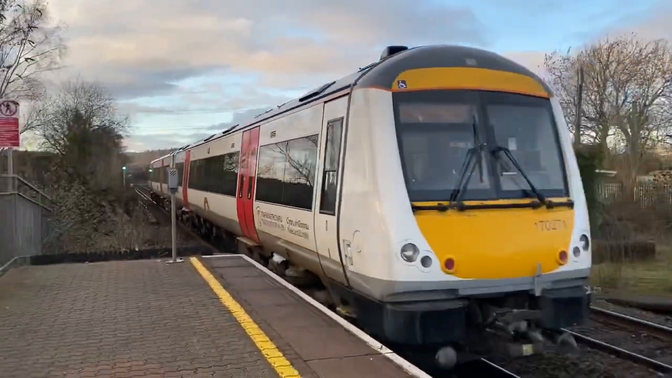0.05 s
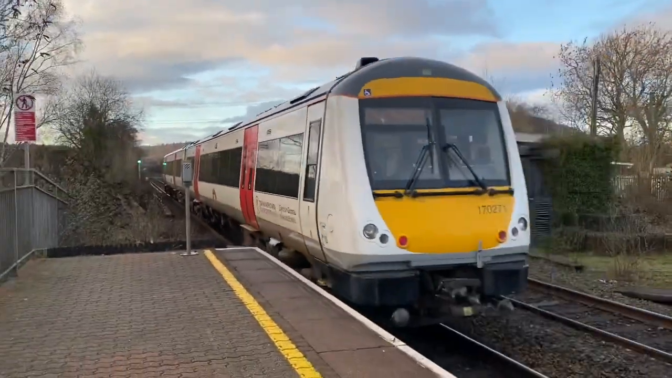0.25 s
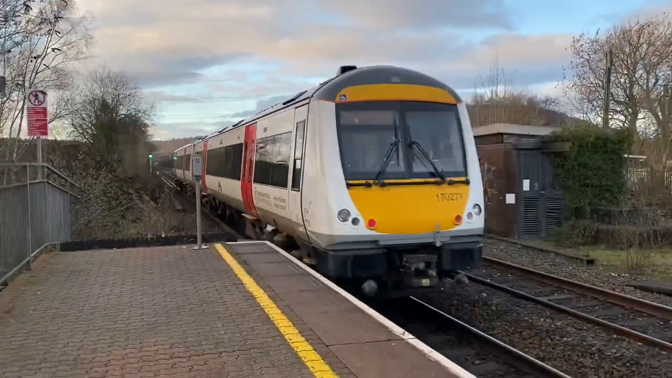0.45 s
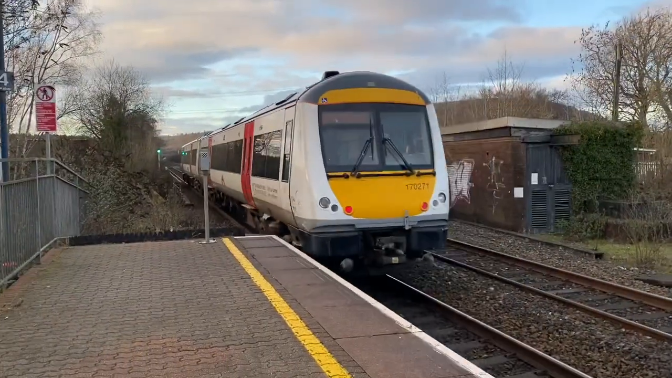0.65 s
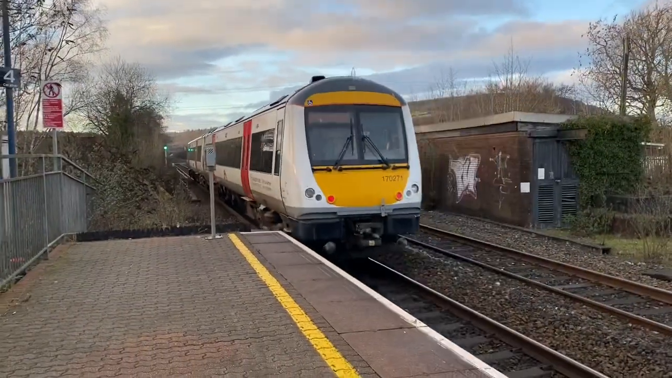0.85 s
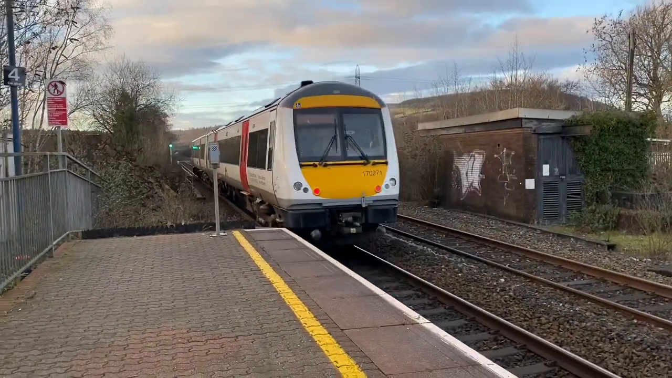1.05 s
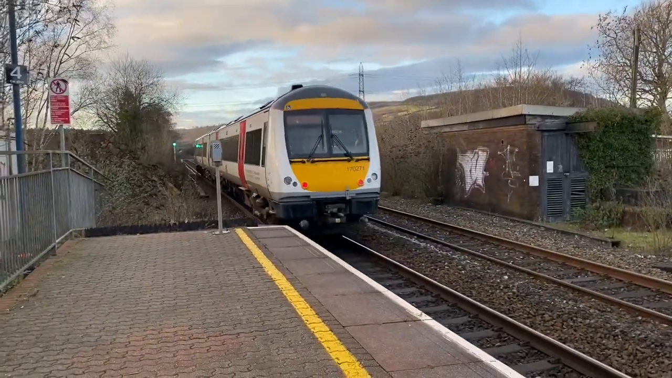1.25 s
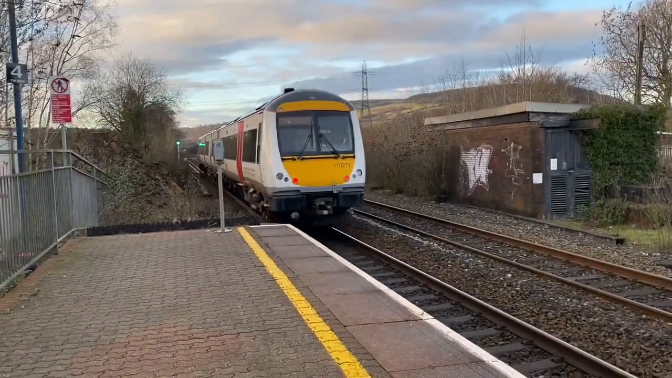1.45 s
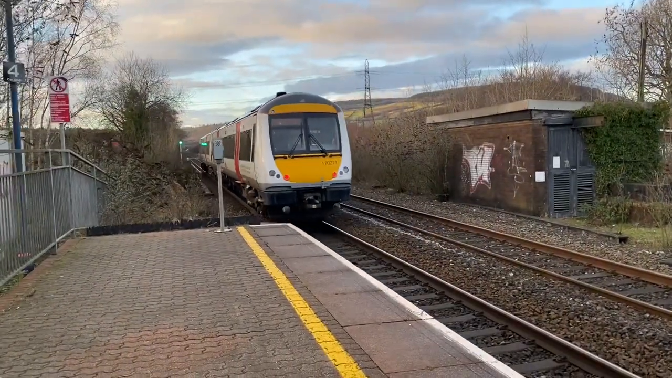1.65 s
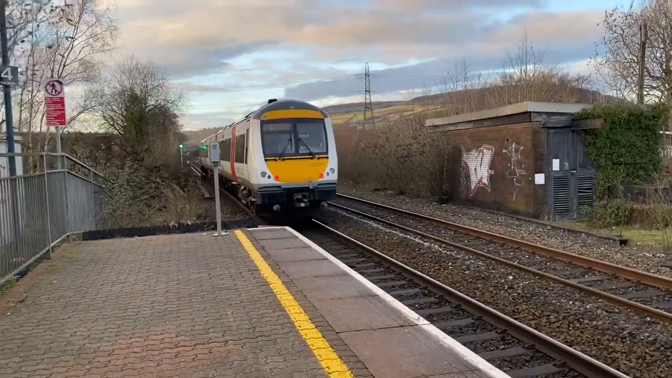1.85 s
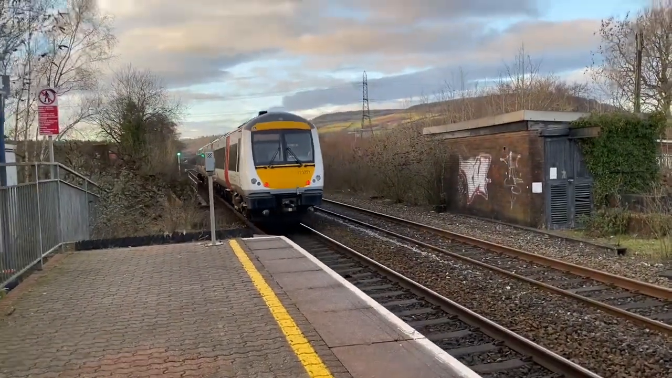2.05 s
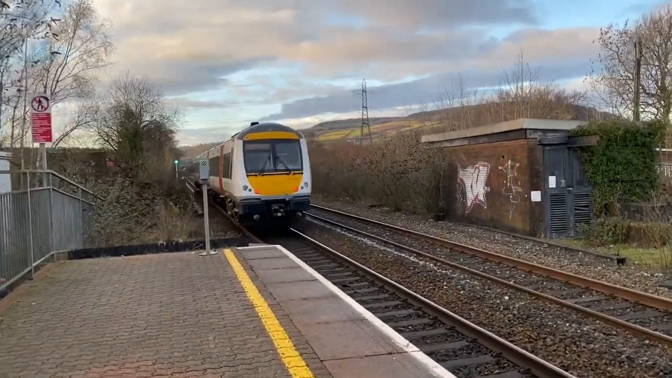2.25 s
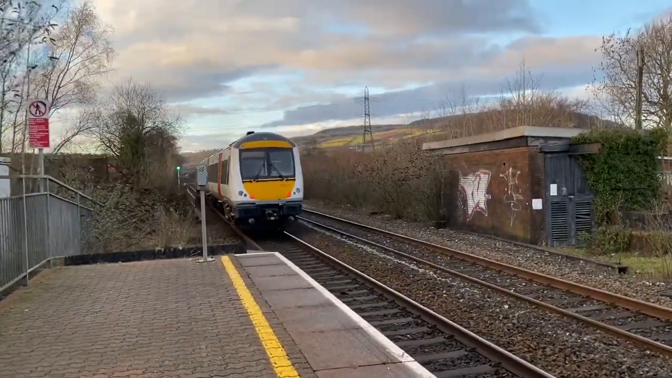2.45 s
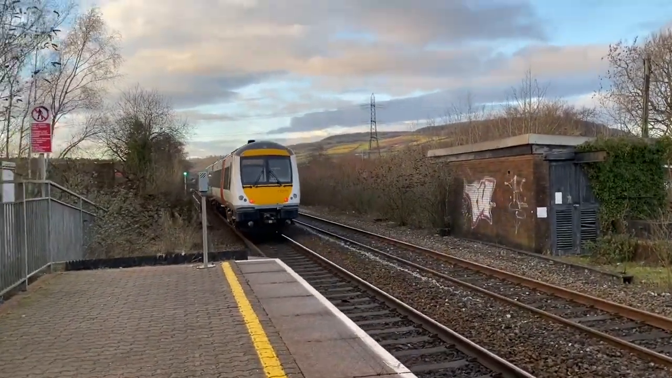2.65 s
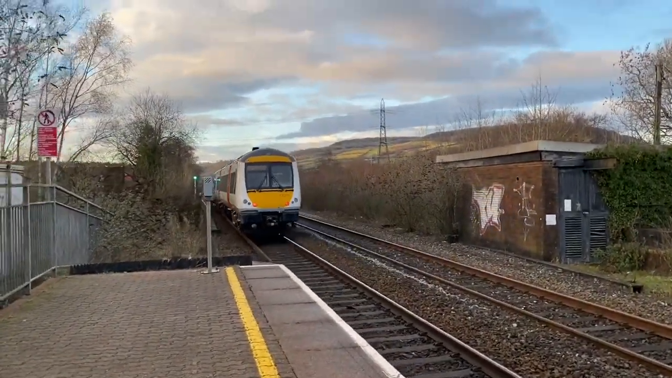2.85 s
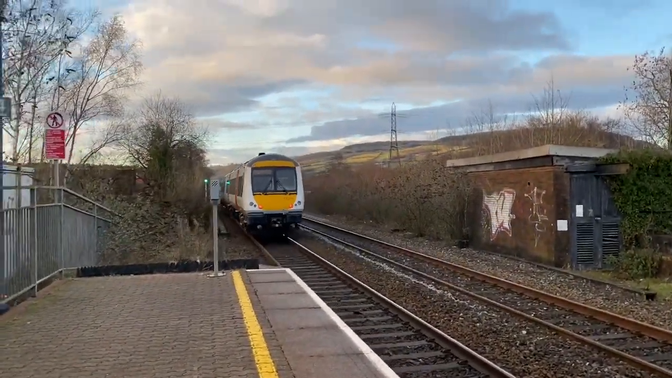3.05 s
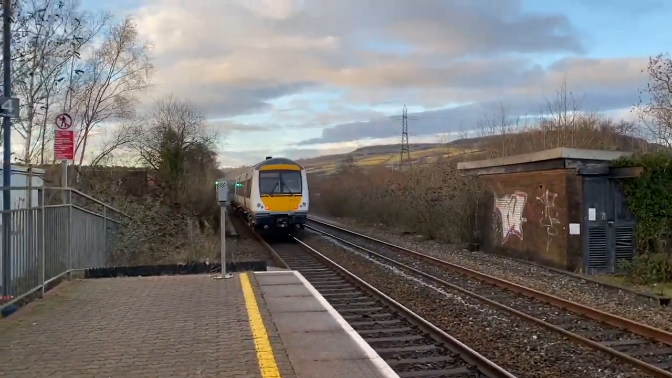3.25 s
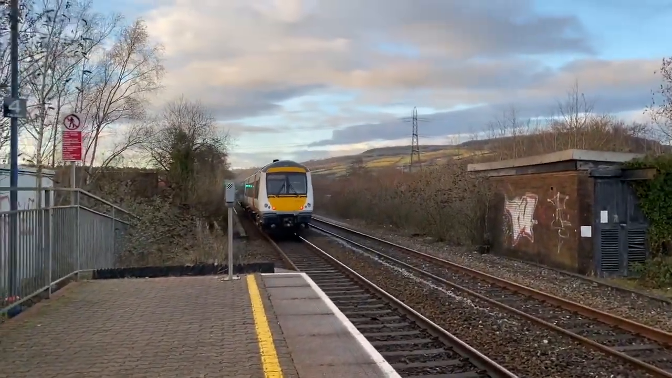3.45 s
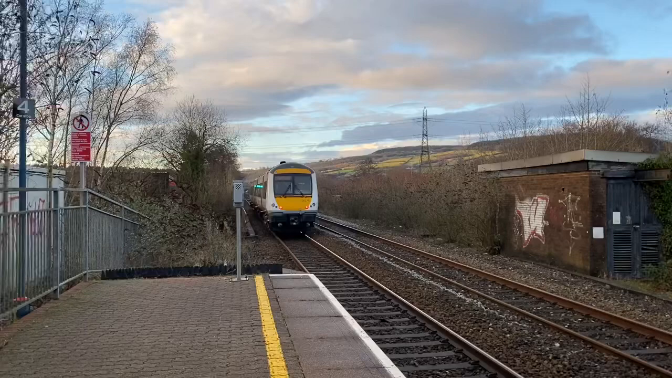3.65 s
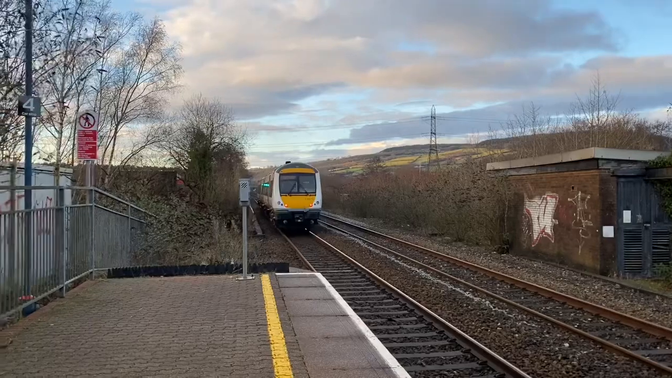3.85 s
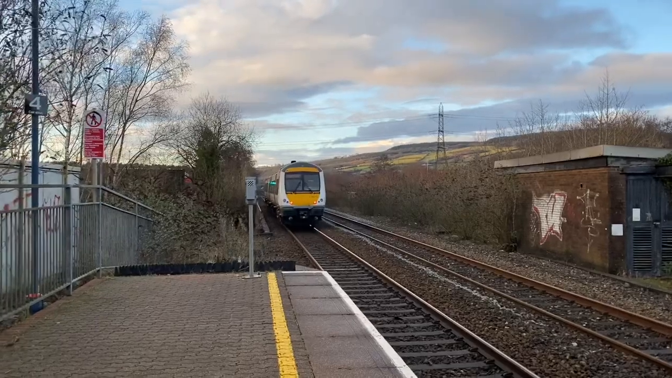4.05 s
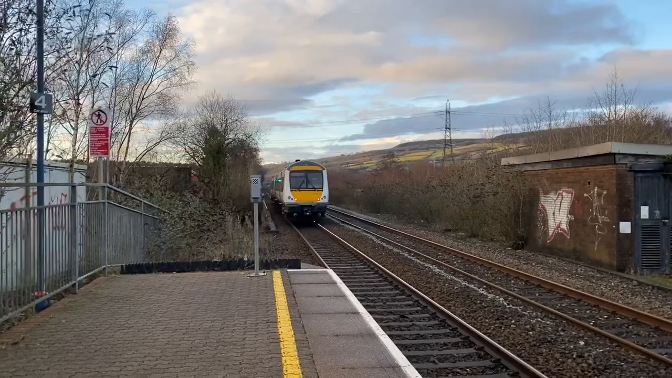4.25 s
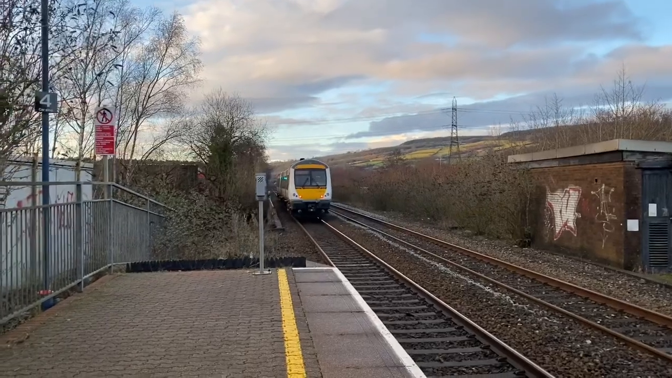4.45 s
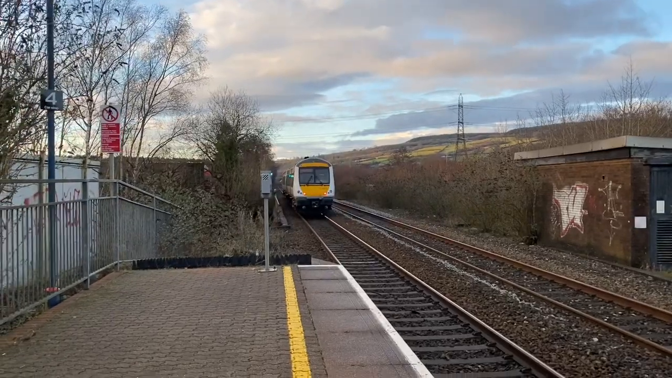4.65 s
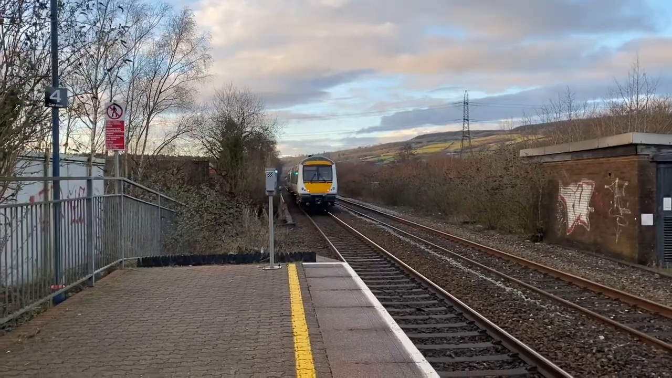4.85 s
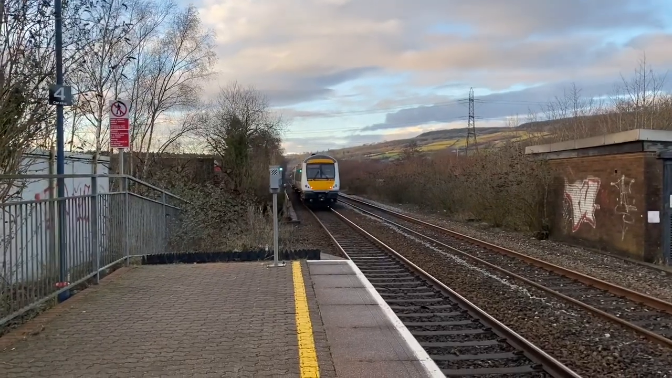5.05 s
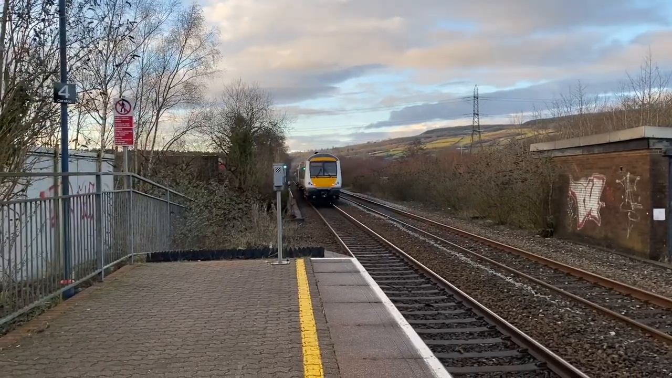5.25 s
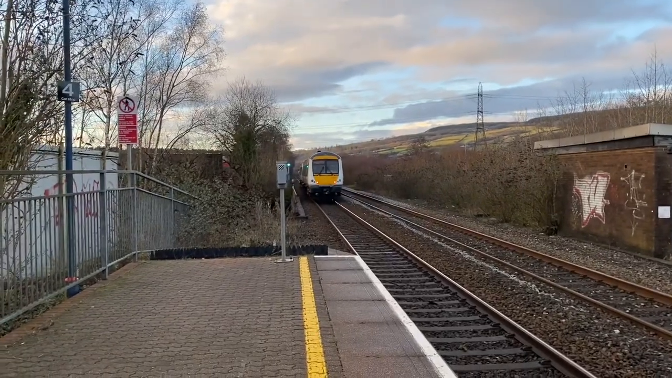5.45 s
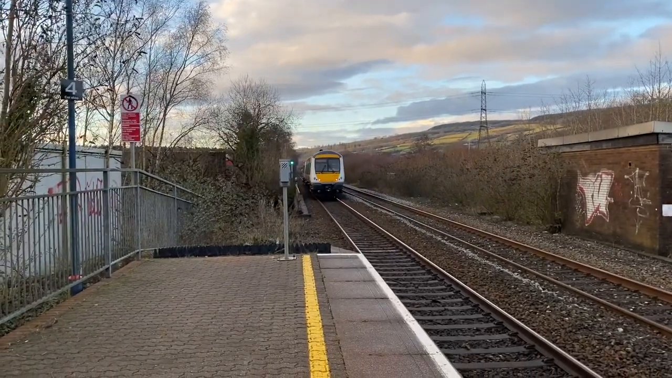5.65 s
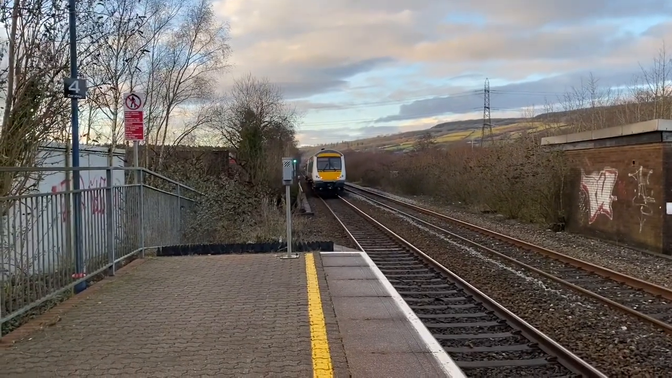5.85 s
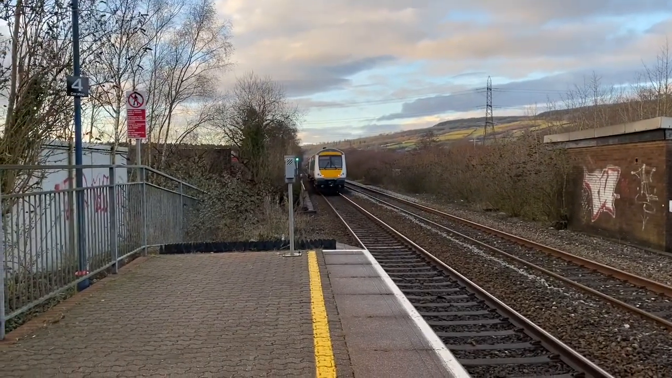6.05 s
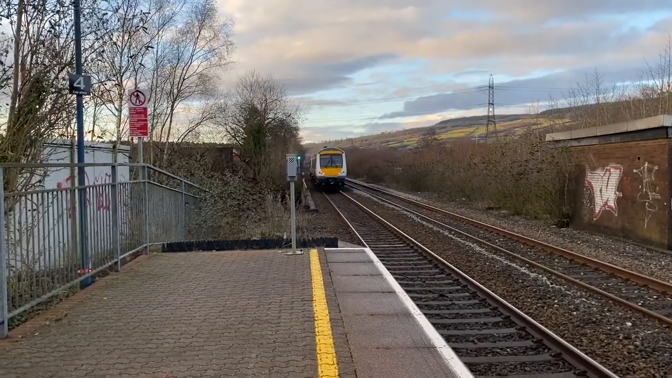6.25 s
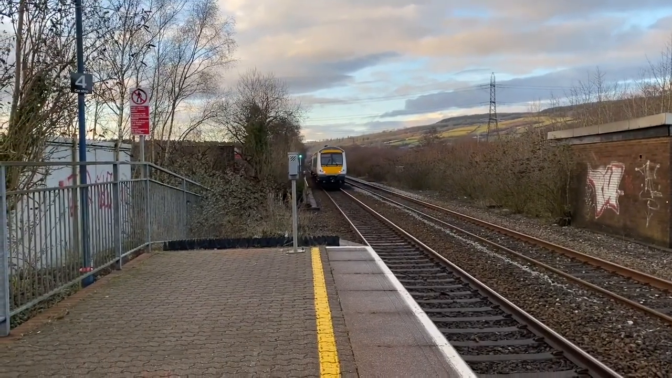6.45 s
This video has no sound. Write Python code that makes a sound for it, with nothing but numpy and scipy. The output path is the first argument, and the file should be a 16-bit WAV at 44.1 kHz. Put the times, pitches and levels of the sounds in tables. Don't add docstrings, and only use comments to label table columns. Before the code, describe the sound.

Outdoors on a station platform, a handheld stereo microphone hears a diesel train leaving. At 0 s it is close and full: two underfloor engines drone low and buzzy, one climbing in pitch through the first couple of seconds, the other nearly steady, so they beat together. Rapid uneven exhaust knocks, wheel roar, boomy rumble, combustion clatter and bright airy hiss surround them. Between 1.3 and 2.8 s the throttle surges, with hoarse singing panels and a faint wavering gear whine. From 3 s the train recedes; knocks blur, hiss and clatter thin out, and a soft hum and rumble remain. Small birds twitter from about 3 s, busier after 4 s, with high short whistles and lower falling chirps. A dull thud comes at 3.5 s, more from 5.4 s, a tiny tick at 5.7 s, and the strongest thud at 6.1 s. A wind hiss swells abruptly from 6.4 s until the end at 6.5 s.

```python
import sys
import numpy as np
from scipy import signal
from scipy.fft import rfft, irfft, next_fast_len
from scipy.io import wavfile
from scipy.ndimage import uniform_filter1d, map_coordinates

SR = 44100
rng = np.random.default_rng(int(sys.argv[2]) if len(sys.argv) > 2 else 0)


def unload_audio(sound):
    columns = np.transpose(np.atleast_2d(sound))
    steps = np.round(np.clip(columns, -1, 1) * 32767)
    wavfile.write(sys.argv[1], SR, steps.astype(np.int16))


def volts_from_decibels(level):
    exponent = np.asarray(level, float) / 20
    return 10 ** exponent


N = 287091
TIME_S = np.arange(N) / SR


def unit(x):
    return x / np.sqrt(np.mean(x ** 2) + 1e-20)


def along(points, hz):
    point_hz, value = np.transpose(points)
    return np.interp(np.log(hz + 1), np.log(point_hz + 1), value)


def curves(rows):
    time_s, *columns = np.transpose(rows)
    return [np.interp(TIME_S, time_s, column) for column in columns]


def wobble(rate_hz):
    steps = np.arange(0, N + 32, 32)
    knots = rng.standard_normal(int(N * rate_hz / SR) + 4)
    return np.interp(np.arange(N), steps, map_coordinates(knots, [steps * rate_hz / SR]))


def patches(shape, bins, frames):
    field = uniform_filter1d(rng.standard_normal(shape), size=bins, axis=0)
    return unit(uniform_filter1d(field, size=frames, axis=1))


def filtered(x, response):
    m = next_fast_len(N + 8192)
    return irfft(rfft(x, m) * response(np.fft.rfftfreq(m, 1 / SR)), m)[..., :N]


def noise(spectrum, patchy_db, gate=1):
    z = signal.stft(rng.standard_normal((2, N)), nperseg=512)[2]
    gain = volts_from_decibels(patchy_db * patches(z.shape[1:], bins=6, frames=10))
    pair = signal.istft(z * gain, nperseg=512)[1][:, :N]
    return unit(filtered(pair * gate, lambda hz: volts_from_decibels(along(spectrum, hz))))


def tone(turns, db, drift, sway_db):
    phase = 2 * np.pi * (turns + rng.random()) + drift * wobble(6.5)
    return np.sqrt(2) * volts_from_decibels(db + sway_db * wobble(9)) * np.sin(phase)


# time_s, throttle_db
THROTTLE = [(0, 0), (1.3, 1.5), (1.9, 4.5), (2.2, 5), (2.5, 5.5), (2.8, 3.5), (3.1, 2), (3.35, 3), (3.6, 3),
            (4.3, 1.5), (5.2, 2.5), (6.51, 0)]


def receding(start_db, spread_db, air_db, throttle_share):
    start_m, speed_m_s = 8, 10
    metres = speed_m_s * TIME_S
    spreading = spread_db * np.log2(1 + metres / start_m)
    return start_db - spreading - air_db * metres / 10 + throttle_share * curves(THROTTLE)[0]


def swells(rows, under_db):
    peak_s, db, half_s = np.transpose(rows)[:, :, None]
    t = np.arange(0, N + 64, 64) / SR
    bells = (volts_from_decibels(db) * np.exp(-((t - peak_s) / half_s) ** 2)).sum(axis=0)
    return 20 * np.log10(np.interp(TIME_S, t, bells) + volts_from_decibels(under_db))


# time_s, firing_hz, level_db, bite_db (per multiple above the second)
REVVING = [(0, 62.8, -30.5, -8), (.25, 66.6, -31.5, -9), (.57, 70.28, -32, -8.5), (.63, 70.9, -31.5, 0.5),
           (1.02, 73.8, -30, -0.5), (1.12, 74.5, -37.5, 0.5), (1.45, 76.3, -38, -8),
           (1.75, 77.43, -32.5, -8), (2, 77.9, -32.5, -6.5), (2.25, 79.54, -27.5, -13),
           (2.8, 80.6, -26, -9), (3, 79.74, -27, -20), (3.25, 81, -26.5, -12), (3.75, 82.06, -29, -12.5),
           (4.25, 82.3, -26, -13), (5.3, 82.85, -35.5, -14), (5.8, 82.45, -31.5, -13),
           (6.51, 82.2, -32, -11.5)]
# freq_hz, gain_db
PIPE = [(62, 1), (83, -22), (120, 3), (192, -1), (215, 2.5), (241, 10), (247, -1.5), (260, 0.5)]


def revving_engine():
    hz, db, bite_db = curves(REVVING)
    firings = np.cumsum(hz) / SR
    out = tone(5 * firings, db + 1.5 * bite_db - 9, drift=.2, sway_db=1.1)
    for k in range(4):
        level_db = db + max(k - 1, 0) * bite_db + along(PIPE, (k + 1) * hz)
        out += tone((k + 1) * firings, level_db, drift=0.12, sway_db=1.14)
    return out


# time_s, firing_hz, level_db
STEADY = [(0, 76.57, -35), (.45, 76.35, -45), (.8, 75.6, -29), (.98, 75.5, -29.5), (1.07, 75.37, -25),
          (1.3, 75.1, -23.5), (1.75, 75.6, -27), (2.4, 75.56, -27), (3, 75, -35), (3.3, 74.14, -33.5),
          (3.9, 73.87, -31), (4.3, 74.26, -32), (5.25, 77.2, -42), (6.51, 78, -43)]
# peak_s, level_db, half_length_s
ECHOES = [
    [(0, -34, 0.2), (.45, -35.5, 0.47), (1.25, -29.5, 0.11), (2.05, -36, 0.16), (3, -35, 0.12),
     (3.62, -32, 0.27)],
    [(0, -34, 0.35), (.7, -33, 0.22), (1.27, -30.5, 0.13), (1.57, -32, .07), (1.8, -35, 0.091),
     (2.15, -33.5, 0.35), (3.9, -44, 0.72), (4.7, -51.5, 0.48), (5.6, -42.5, 0.33), (6.4, -45.5, 0.47)],
    [(.3, -58, 0.25), (1.8, -55, 0.31), (3.75, -42, 0.52), (6.15, -48.5, 0.26)],
]
# camshaft_multiple, level_db
UNEVEN = [(4, -8), (5, 3), (7, -4), (8, -4), (9, 0), (10, -4), (11, 0), (14, 0), (15, 3), (17, -4),
          (21, -4), (22, 1), (27, -4), (38, -7)]


def steady_firings():
    return np.cumsum(curves(STEADY)[0]) / SR


def firing_pulse():
    return np.cos(2 * np.pi * steady_firings())


def steady_engine():
    firings = steady_firings()
    out = tone(firings, curves(STEADY)[1], drift=0.12, sway_db=1.0)
    for k, rows in enumerate(ECHOES):
        between_db = receding(-38 - 4 * k, 2.6, 0.59, 0)
        out += tone((k + 2) * firings, swells(rows, between_db), drift=0.12, sway_db=1.0)
    uneven_db = receding(-42, 0.25, 2.73, 0.093)
    for k, db in UNEVEN:
        out += tone(k / 6 * firings, uneven_db + db, drift=.45, sway_db=2.5)
    return out


# peak_s, level_db, half_length_s
SHAFT = [(0, -33, 0.15), (.55, -32, 0.14), (1.1, -48, .25), (1.82, -33, 0.17), (3.4, -38, 0.21),
         (5.25, -45.5, 0.22)]


def drive_shaft():
    start_hz, gain_hz_s, ease_hz_s2 = 81.05, 4.7, .17
    hz = start_hz + gain_hz_s * TIME_S - ease_hz_s2 * TIME_S ** 2
    return tone(np.cumsum(hz) / SR, swells(SHAFT, receding(-35, 2.8, 0.98, 0)), drift=0.51, sway_db=0.0)


# freq_hz, density_db
RUMBLE = [(20, -60), (35, -18.5), (60, -2), (110, -1), (190, -5), (260, -6), (380, -17.5), (520, -62)]


def rumble():
    level_db = receding(-30, 1.5, 0.53, 0.3) + .8 * wobble(4)
    return volts_from_decibels(level_db) * noise(RUMBLE, patchy_db=1.2)


def roar_level_db():
    return receding(-35, 1.2, 1.49, 0.19)


# freq_hz, density_db
ROLL = [(250, -36), (340, 0), (400, -3.5), (480, -1.5), (650, -2.5), (800, -4.5), (1000, -10), (1400, -42)]


def rolling():
    return volts_from_decibels(roar_level_db()) * noise(ROLL, patchy_db=1.36, gate=1 + 0.065 * firing_pulse())


CYLINDERS = [0, -13, -4, -12, -7, -12]
# time_s, level_db
SET_FIRINGS = [(0.045, -25), (0.176, -24), (0.254, -16.5), (0.278, -23), (0.31, -32), (0.333, -22), (0.389, -30),
               (0.412, -32), (0.458, -31), (0.482, -25), (0.544, -24), (0.569, -21), (0.648, -17), (0.72, -21),
               (0.939, -24), (1.229, -25)]


def exhaust_knocks():
    firings = steady_firings() - 1.56
    at = np.flatnonzero(np.diff(np.floor(firings)))
    cylinder = np.floor(firings[at + 1]).astype(int) % 6
    size_db = np.take(CYLINDERS, cylinder) + 2 * rng.standard_normal(len(at))
    set_s, set_db = np.transpose(SET_FIRINGS)
    nearest = np.abs(at[:, None] / SR - set_s - .002).argmin(axis=0)
    size_db[nearest] = set_db + 26 + 4.5 * set_s
    blows = np.zeros(N)
    blows[at] = volts_from_decibels(size_db)

    def box(hz, mode_hz=620, width_hz=620, blunt_hz=950):
        mode = 1j * hz * width_hz / (mode_hz ** 2 - hz * hz + 1j * hz * width_hz)
        return mode / (1 + 1j * hz / blunt_hz) ** 2

    near = volts_from_decibels(roar_level_db() - 5.5 - 6.6 * TIME_S) * unit(filtered(blows, box))
    return np.array([near, 0.53 * np.roll(near, 500)])


# freq_hz, density_db
BOX = [(430, -28), (560, 3.5), (650, 8), (760, -3), (950, -34)]
# peak_s, level_db, half_length_s
BOX_OPEN = [
    (.25, -37.5, 0.7),
]


def silencer():
    return volts_from_decibels(swells(BOX_OPEN, -88)) * noise(BOX, patchy_db=2.0)


# freq_hz, density_db
VALLEY = [(300, -13), (500, 0), (1000, -3.5), (1600, -1), (2600, -4.5), (3500, -12.5), (6000, -46)]


def valley():
    return volts_from_decibels(-48) * noise(VALLEY, patchy_db=1.2)


# freq_hz, density_db
RAIL = [(600, -47), (850, -4.5), (1000, -1.5), (1200, -2.5), (1380, -2.5), (1480, -4), (1800, -40)]


def rails():
    gate = 1 + 0.046 * firing_pulse()
    return volts_from_decibels(receding(-43, -3.5, 3, 0.55)) * noise(RAIL, patchy_db=1.3, gate=gate)


# freq_hz, density_db
CLATTER = [(1400, -13), (1650, -1.5), (1800, 0), (1900, 2), (2100, -1.5), (2300, -7.5), (2800, -52)]


def clatter(surge):
    level_db = receding(-47, -2.5, 2.5, 1) + 0.43 * surge
    return volts_from_decibels(level_db) * noise(CLATTER, patchy_db=.6, gate=1 + 0.06 * firing_pulse())


# freq_hz, density_db
TURBO = [(1900, -37), (2200, -7), (2380, 4), (2500, 3), (2620, 2.5), (2750, 3), (3600, -62)]


def turbo():
    level_db = receding(-47.5, -2.5, 4, 1.05) - 2 + 0.15 * wobble(7.5)
    return volts_from_decibels(level_db) * noise(TURBO, patchy_db=1.5)


# time_s, gain_db
BREEZE = [(0, -0.5), (1.3, 1), (1.65, 0), (2, 2), (2.3, -1), (3, -1), (3.5, -2), (4, 0.5), (4.7, -0.3),
          (5.4, 3), (5.9, -1.5), (6.51, 1.5)]
# freq_hz, density_db
RUSH = [(1710, -33), (2900, -2), (4390, -2.5), (4970, -7.5), (5770, -9.5), (6300, -9.5), (8190, -18.5),
        (13900, -120)]


def fan_rush(surge):
    level_db = receding(-44.5, 1.5, 0.95, 0.76) + 0.28 * curves(BREEZE)[0] + 0.5 * surge
    return volts_from_decibels(level_db) * noise(RUSH, patchy_db=1.27)


# freq_hz, density_db
HISS = [(5200, -64), (6100, -5), (6800, 1.5), (8000, 1), (9000, 2), (9800, 6), (11000, -6), (12500, -3.5),
        (13500, -8), (13750, -60)]
# freq_hz, density_db
SIZZLE = [(12000, -40), (13500, -8), (14200, -4), (14600, 1), (15100, 2), (15400, -2), (15700, -4),
          (17000, -40)]


def hiss(surge):
    level_db = receding(-44.5, 0, 3.5, 0.25) + curves(BREEZE)[0]
    sizzle_db = level_db - 14 - .1 * TIME_S
    return volts_from_decibels(level_db + 1.1 * surge) * noise(HISS, patchy_db=0.5) + volts_from_decibels(sizzle_db) * noise(SIZZLE, patchy_db=3.5)


# centre_hz, width_hz, peak_s, level_db, half_length_s
SINGING = [(2242, 63, .62, -47, 0.2), (2220, 54, 1.05, -50, 0.28), (2430, 110, 1.1, -51, 0.18),
           (2500, 150, .75, -52, 0.11), (2480, 81, 1.34, -52, 0.41), (2520, 70, 2.1, -51, 0.43),
           (2650, 80, 2.402, -55, 0.39), (2400, 160, .1, -48.5, 0.3), (694, 150, .17, -42, 0.11),
           (650, 140, .55, -41, 0.092), (2350, 59.7, 1.5, -51, 0.18), (1830, 90, 1.8, -58, .2),
           (1910, 90, 2.14, -46, 0.24), (1980, 170, 2.87, -49, 0.28), (854, 88, 2.33, -43.5, 0.63),
           (675, 48, 2.13, -44.5, 0.86), (667, 81, 1.04, -44.5, 0.55), (1007, 110, 2.92, -46.5, 0.23),
           (460, 27, 1.18, -43, 0.68), (465.7, 59, 3, -44.5, 0.51), (1100, 76, 1.18, -44.5, 0.36),
           (1276, 45, 3.22, -46, 0.39), (880, 83, 0.97, -44, 0.45), (2100, 69.6, 2.337, -54, 0.4),
           (1640, 160, 4, -53, 1), (2810, 114, 4.3, -62, 0.99), (1260, 101, 5.4, -53.5, 0.79),
           (2392, 280, 1.17, -54, 0.48), (2550, 150, 2, -57, 0.33), (271, 13, 1.6, -40, 1),
           (422, 40, 0.27, -44.5, .2)]


def singing():
    hz, t, z = signal.stft(rng.standard_normal((2, N)), SR, nperseg=1024)
    gain = np.zeros(z.shape[1:])
    for centre_hz, width_hz, peak_s, db, half_s in SINGING:
        band = 1 / (1 + (2 * (hz[:, None] - centre_hz) / width_hz) ** 2)
        gain += volts_from_decibels(db) / np.sqrt(width_hz) * band * np.exp(-((t - peak_s) / half_s) ** 2)
    gain *= volts_from_decibels(2.4 * patches(gain.shape, bins=4, frames=7) - 0.9)
    return np.sqrt(SR / 1.6) * signal.istft(z * gain, SR, nperseg=1024)[1][:, :N]


# peak_s, level_db, half_length_s
WHINE = [(1.42, -49, .06), (1.9, -46, 0.17), (2.25, -46.5, 0.24), (2.65, -47.5, 0.24), (2.75, -67, 0.12)]


def gear_whine():
    hz = 18 * curves(STEADY)[0] + 17 * wobble(45)
    return tone(np.cumsum(hz) / SR, swells(WHINE, -90) + 2 * wobble(40), drift=1, sway_db=1.2)


# middle_s, level_db, pitch_hz, length_s, glide_hz
HIGH_BIRD = [(2.829, -53, 6300, 0.033, 210), (2.855, -54, 5030, 0.022, 170), (3.666, -53, 4860, .018, -61),
             (3.905, -51, 6380, 0.025, 0), (3.925, -54, 6150, .012, -400), (4.218, -48, 5910, 0.0141, 100),
             (4.236, -52, 6130, .012, 100), (4.21, -52, 5030, 0.011, 1392), (4.243, -49, 5210, .012, -800),
             (4.28, -54, 2947, .015, 0), (4.7, -54, 5240, .02, 0), (4.7, -59, 4400, 0.046, -200),
             (4.32, -47, 5700, 0.018, 239), (4.598, -53, 4890, 0.042, 100), (4.745, -55, 5120, 0.032, -200),
             (4.787, -53, 5020, 0.028, -130), (5.025, -53, 5290, 0.051, 220), (5.386, -51, 5500, .022, 50),
             (5.41, -45, 5300, 0.011, 1100), (5.42, -48, 5580, .012, 250), (5.433, -47, 5800, .011, -150),
             (5.443, -47, 4904, 0.013, -2000), (5.446, -48, 5300, 0.0063, -900),
             (5.454, -54, 3800, .008, -300), (5.467, -57, 5900, .02, 0), (5.515, -53, 5210, 0.034, -300),
             (5.356, -48, 3786, .016, 600), (5.721, -51, 5204, .028, -200), (5.906, -49, 5350, .012, -400),
             (5.926, -58, 4980, .02, -200), (6.046, -54, 5480, 0.013, 0), (6.052, -51, 4800, .008, 700),
             (6.06, -52, 5140, .014, 0), (6.173, -51, 5110, .02, -450), (6.194, -44, 5440, .016, 150),
             (6.206, -55, 5470, .012, -700), (6.328, -51, 5244, 0.017, -19), (6.37, -56, 4740, 0.034, -100)]
# middle_s, level_db, pitch_hz, length_s
LOW_BIRD = [(3.42, -49, 3247, .015), (3.815, -45.5, 3900, 0.03), (3.853, -46, 3500, .014),
            (3.869, -41.5, 3500, 0.024), (4.28, -52, 3750, 0.027), (4.306, -48, 3930, 0.014),
            (4.331, -46, 3330, .023), (4.375, -48, 3640, .016), (4.63, -46, 3510, 0.019),
            (4.737, -50, 3600, 0.031), (4.758, -50, 4250, 0.023), (4.788, -52, 3650, 0.021),
            (4.865, -61, 4515, 0.023), (5.043, -51, 3460, 0.014), (5.062, -45, 3520, .015),
            (5.209, -56, 3610, 0.051), (5.385, -49, 3640, 0.01496), (5.51, -52, 3875, 0.0163),
            (5.805, -55, 3750, 0.031), (6.016, -55, 3400, .02), (6.091, -49, 3410, 0.0196),
            (6.11, -49, 3430, 0.021), (6.13, -51, 3270, 0.034), (6.245, -52, 3734, .02),
            (6.302, -56, 3732, .03)]


def birds():
    low_fall_hz_s = 7800
    notes = HIGH_BIRD + [(*note, -low_fall_hz_s * note[3]) for note in LOW_BIRD]
    out, flutter, warble = np.zeros(N + SR), wobble(250), wobble(300)
    for middle_s, db, pitch_hz, length_s, glide_hz in notes:
        u = np.linspace(-.5, .5, round(1.5 * length_s * SR))
        i = round(middle_s * SR) - len(u) // 2
        span = slice(i, i + len(u))
        spread_hz = 1800 * length_s * warble[span]
        turns = np.cumsum(pitch_hz + 1.24 * glide_hz * u + spread_hz) / SR
        out[span] += volts_from_decibels(db + 0.15 + 1.4 * flutter[span]) * np.cos(np.pi * u) * np.sin(2 * np.pi * turns)
    lags_s = rng.uniform(0.0034, .032, (2, 5))

    def echoes(hz):
        late = np.exp(-2j * np.pi * lags_s[:, :, None] * hz).sum(axis=1)
        return volts_from_decibels([[1.2], [-1.2]]) + volts_from_decibels(-12) * late

    return filtered(out[:N], echoes)


# start_s, level_db, pitch_hz, t60_s
KNOCKS = [
    (3.55, -31.5, 101, 0.22),
    (5.6941, -30, 2193, 0.0059),
    (5.696, -22.5, 860, 0.0093),
    (5.37, -31, 56, .25),
    (5.71, -28, 52.5, 0.22),
    (5.8, -31, 65, .15),
    (6.081, -23, 107, 0.24),
]


def knocks():
    out, t = np.zeros(N + SR), np.arange(SR // 2) / SR
    for start_s, db, hz, t60_s in KNOCKS:
        onset = 1 - np.exp(-t * 30 / t60_s)
        out[round(start_s * SR):][:len(t)] += volts_from_decibels(db - 60 * t / t60_s) * np.sin(2 * np.pi * hz * t) * onset
    return out[:N]


GUST_START_S, GUST_END_S = 6.41, 6.51
# freq_hz, density_db
GUSTY = [(300, -40), (1000, -3), (4000, 2), (8000, -2), (12000, -6), (14000, -13), (15800, -12)]


def gust():
    rise = np.clip((TIME_S - GUST_START_S) / (GUST_END_S - GUST_START_S), 0, None)
    return volts_from_decibels(-37.5) * rise ** 3.6 * noise(GUSTY, patchy_db=.6)


# freq_hz, correlation
ALIKE = [(40, .72), (70, .98), (200, .985), (330, .91), (700, .68), (1000, .55), (1400, .3), (2000, .58),
         (4300, .58), (5600, .33), (6500, .75), (7000, .9), (8000, .68), (9500, .88), (12100, .65)]
# freq_hz, level_db
LEAN = [(60, -.6), (200, -.5), (380, .2), (700, 2.6), (1300, 2.8), (2400, 2.2), (4400, 2.6), (6200, 2.2),
        (8000, 0)]
# freq_hz, phase_rad
LEAD = [(700, 0), (1600, -2.1), (2000, -.3), (2900, .7), (4000, .1), (5000, .5), (7350, 0), (7800, -1.4),
        (8600, -3), (9200, -3.3), (10400, -5.5), (11500, -6.4), (12600, -9.3), (14600, -12.5)]


def ports(pair):
    def mix(hz):
        turn = np.arccos(np.clip(along(ALIKE, hz), -1, 1)) / 2
        return np.array([np.cos(turn), np.sin(turn)])

    def tilt(hz):
        left = volts_from_decibels(along(LEAN, hz) / 2) * np.exp(.5j * along(LEAD, hz))
        return np.array([left, 1 / left])

    mid, side = filtered(pair, mix)
    return filtered(np.array([mid + side, mid - side]), tilt)


def scene():
    surge = wobble(8)
    tones = revving_engine() + steady_engine() + drive_shaft() + gear_whine() + knocks()
    train = rumble() + rolling() + exhaust_knocks() + silencer() + valley() + rails()
    train += clatter(surge) + turbo() + fan_rush(surge) + hiss(surge) + singing()
    return ports(train + gust() + np.array([tones, np.roll(tones, 735)])) + birds()


# freq_hz, start_rarity, rarity_gain_per_s
SCRAP_BANDS = [(12450, 2.3, 0), (13700, 2.5, 0), (13800, .1, .35), (14400, -.2, .4), (14900, -.5, .42),
               (15250, -1.1, 1.2), (15700, -.8, 1.8)]


def ragged(mid, side):
    hz, t, z = signal.stft(np.array([mid, side]), SR, nperseg=1024)
    luck = patches(z.shape[1:], bins=11, frames=3)
    band_hz, start, gain = np.transpose(SCRAP_BANDS)
    start = np.interp(hz, band_hz, start)[:, None]
    gain = np.interp(hz, band_hz, gain)[:, None]
    rarest = np.maximum(start, 1.75 + np.maximum(gain - .7, 0))
    rarity = np.minimum(start + gain * t, rarest)
    gusting = t > GUST_END_S - .06
    side_top_hz = 13800 + 400 * unit(uniform_filter1d(rng.standard_normal(len(t)), size=3))
    hz = hz[:, None]
    keep_mid = (luck > rarity) | (hz < band_hz[0]) | gusting & (hz > band_hz[1])
    keep_side = (hz < side_top_hz) | gusting
    return signal.istft(z * [keep_mid, keep_side], SR, nperseg=1024)[1][:, :N]


def band_limit(x):
    return signal.sosfilt(signal.butter(12, 15940, fs=SR, output="sos"), x)


# low_hz, high_hz
NO_MID = [(8700, 9200), (15680, 22050)]
# low_hz, high_hz
NO_SIDE = [(6900, 7500), (10400, 11680), (14600, 22050)]


def record(dry):
    def kept(hz, bands):
        return 1 - sum((hz > low_hz) & (hz < high_hz) for low_hz, high_hz in bands)

    sums = np.array([dry[0] + dry[1], dry[0] - dry[1]]) / 2
    mid, side = filtered(sums, lambda hz: np.array([kept(hz, NO_MID), kept(hz, NO_SIDE)]))
    mid, side = ragged(mid, side)
    return band_limit(np.array([mid + side, mid - side]))


dry = scene()
out = record(dry)
unload_audio(out)
```